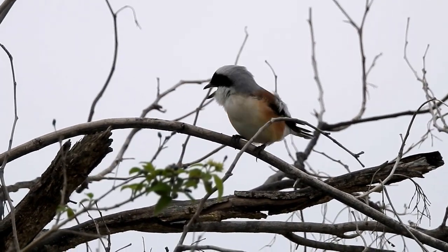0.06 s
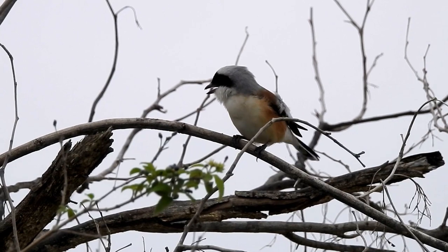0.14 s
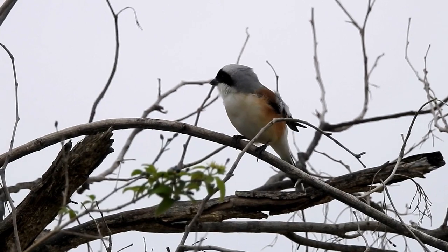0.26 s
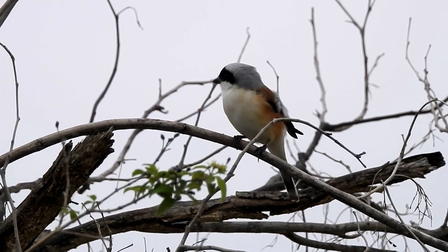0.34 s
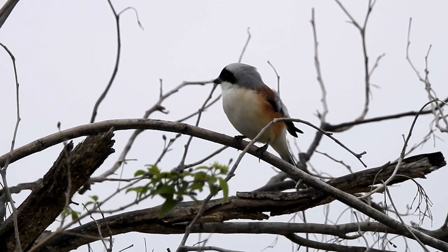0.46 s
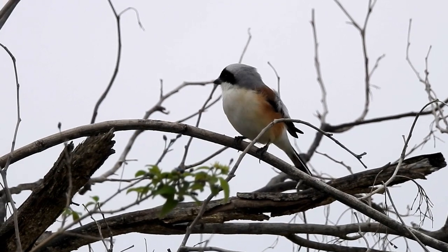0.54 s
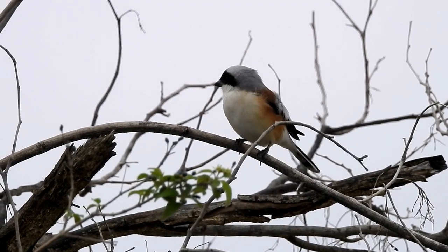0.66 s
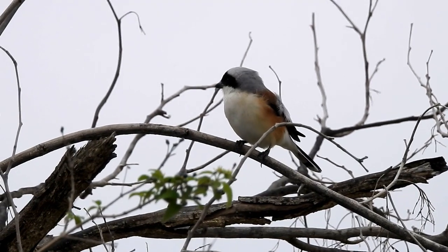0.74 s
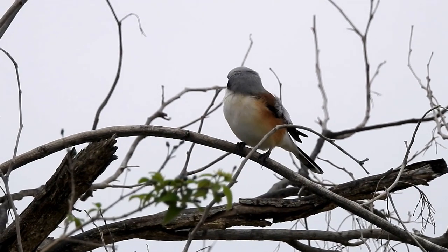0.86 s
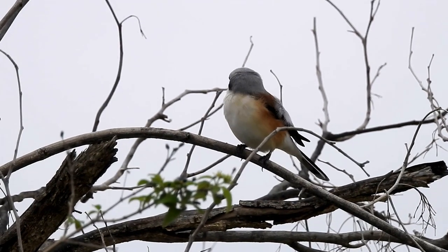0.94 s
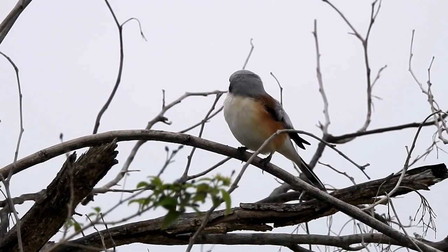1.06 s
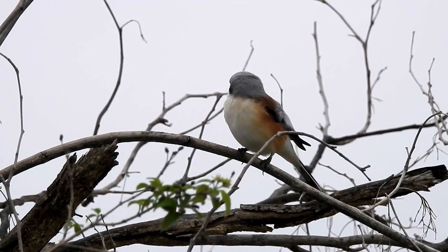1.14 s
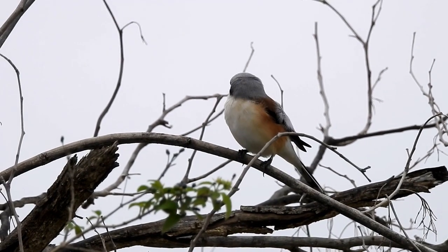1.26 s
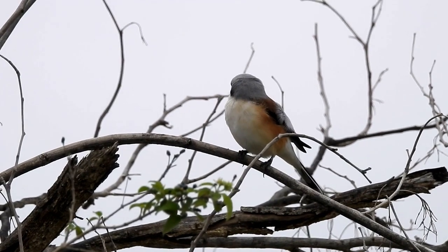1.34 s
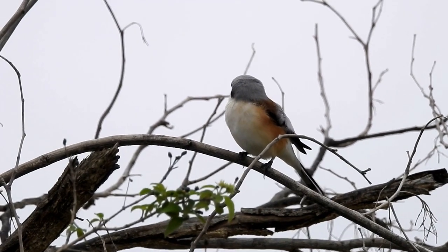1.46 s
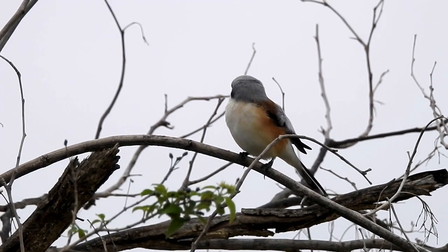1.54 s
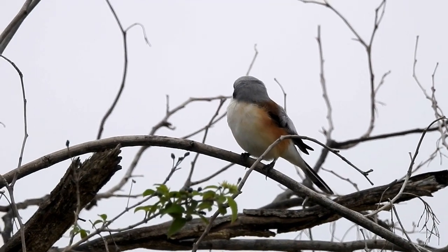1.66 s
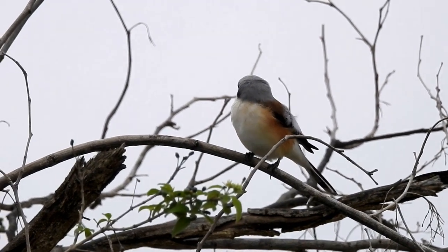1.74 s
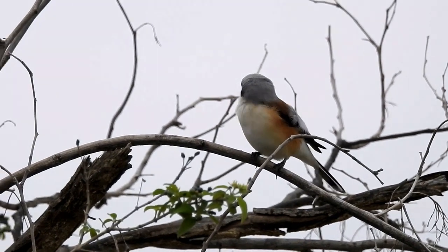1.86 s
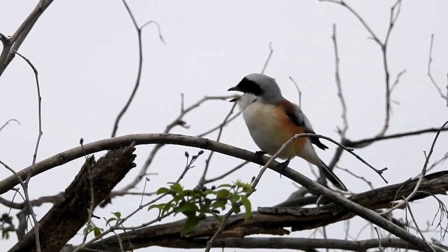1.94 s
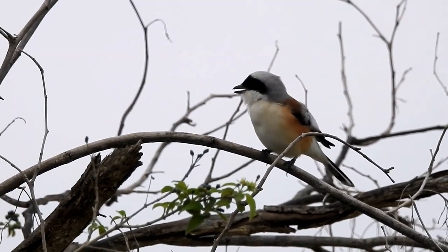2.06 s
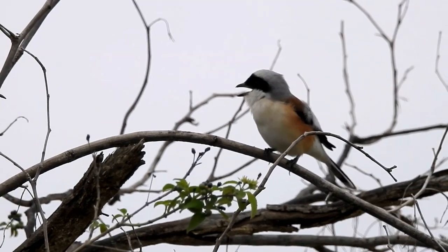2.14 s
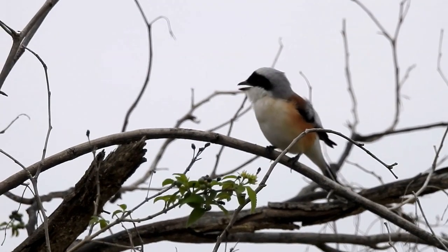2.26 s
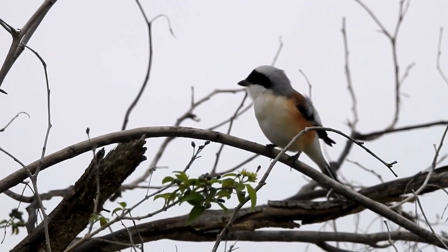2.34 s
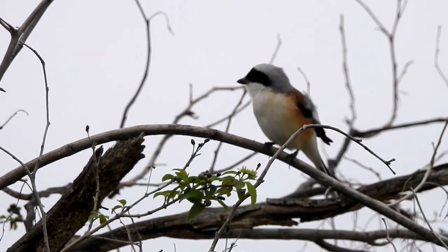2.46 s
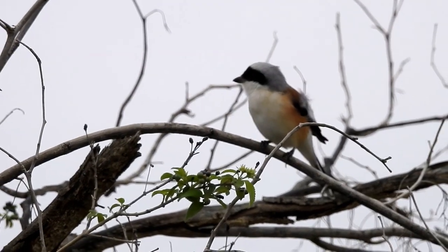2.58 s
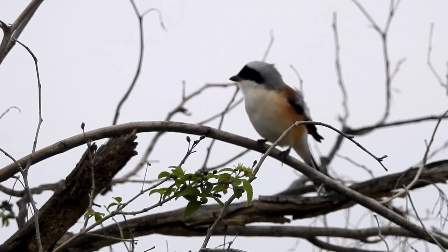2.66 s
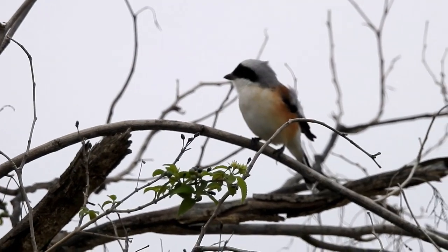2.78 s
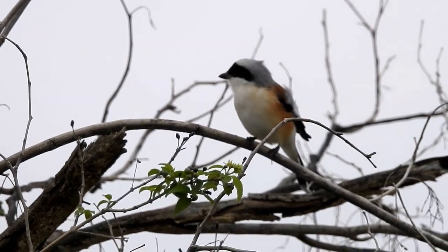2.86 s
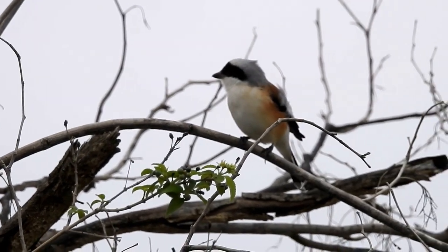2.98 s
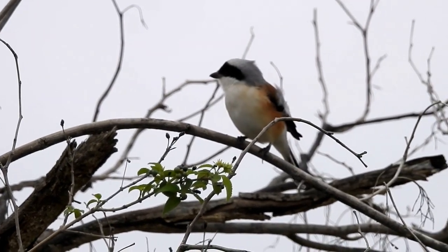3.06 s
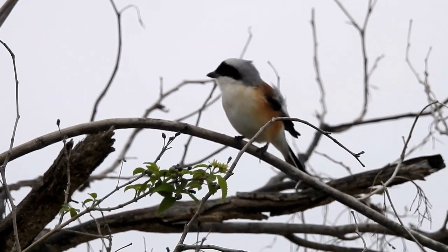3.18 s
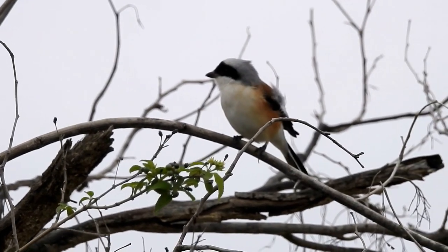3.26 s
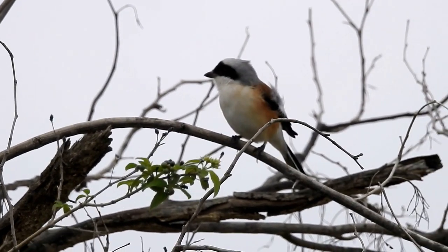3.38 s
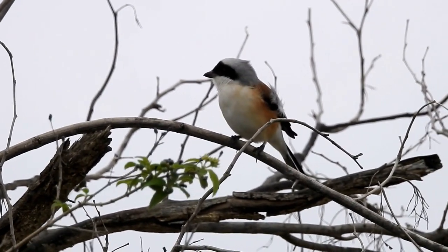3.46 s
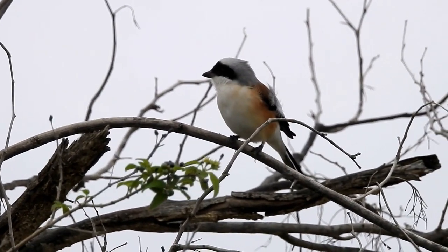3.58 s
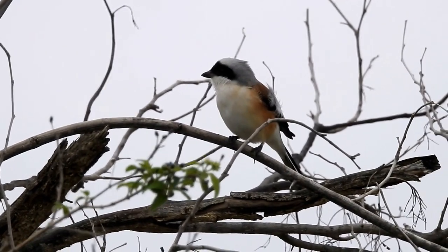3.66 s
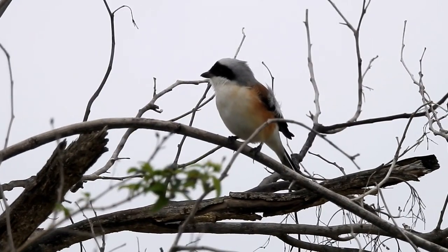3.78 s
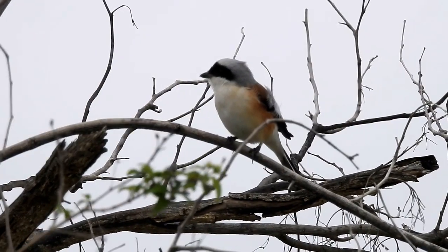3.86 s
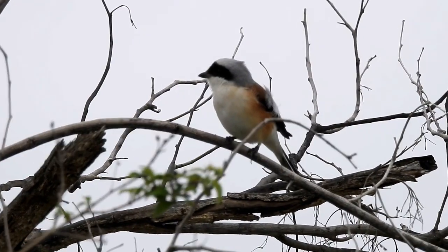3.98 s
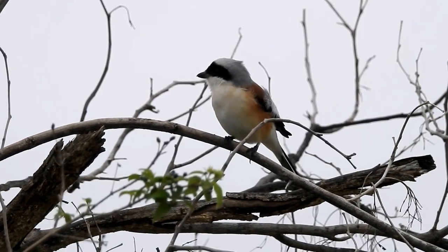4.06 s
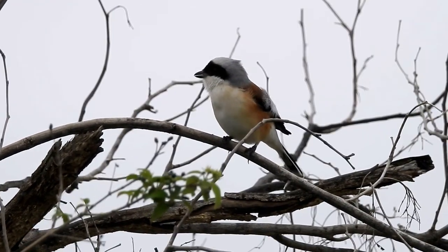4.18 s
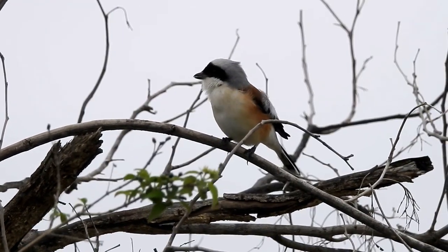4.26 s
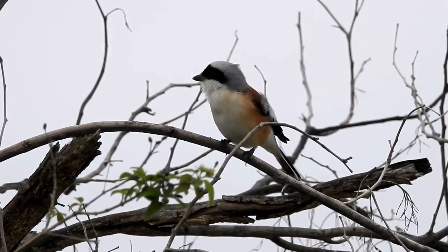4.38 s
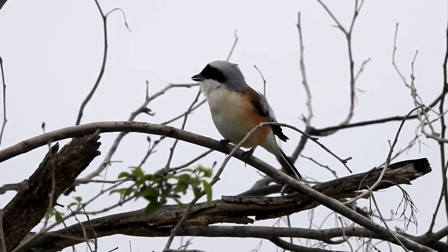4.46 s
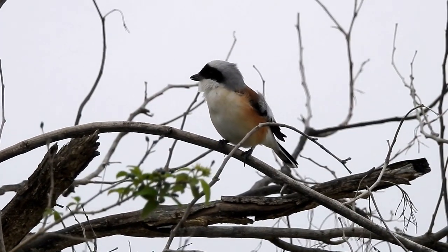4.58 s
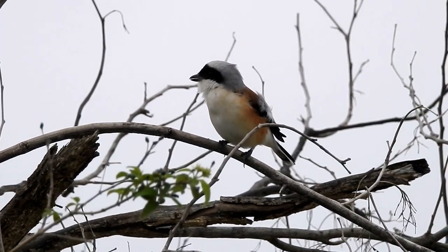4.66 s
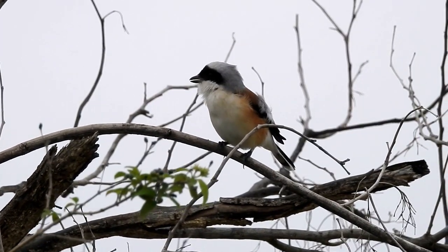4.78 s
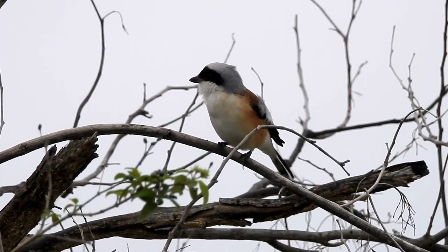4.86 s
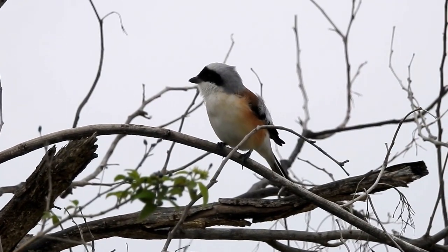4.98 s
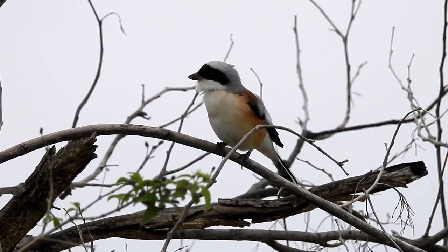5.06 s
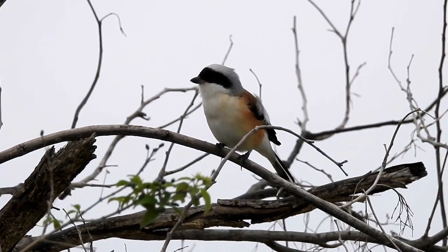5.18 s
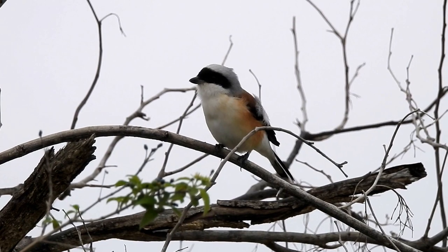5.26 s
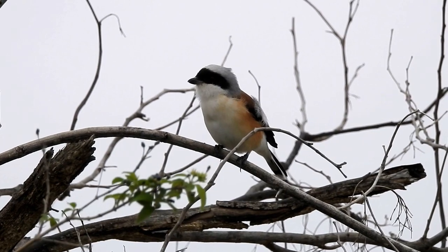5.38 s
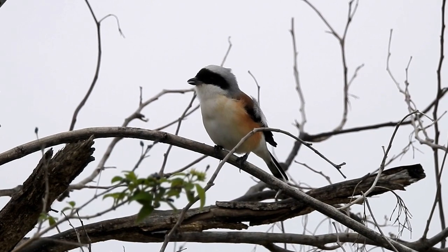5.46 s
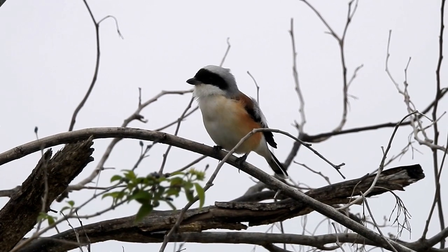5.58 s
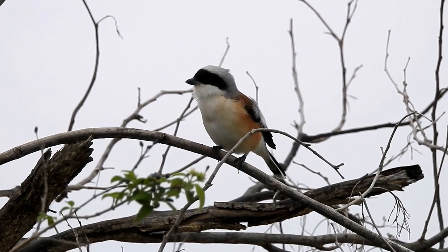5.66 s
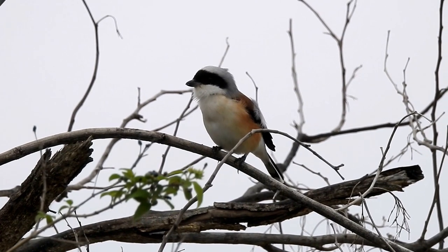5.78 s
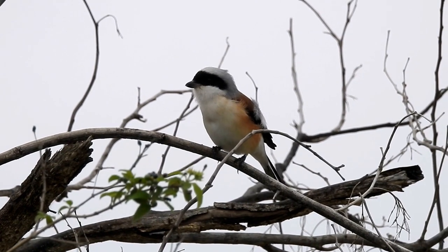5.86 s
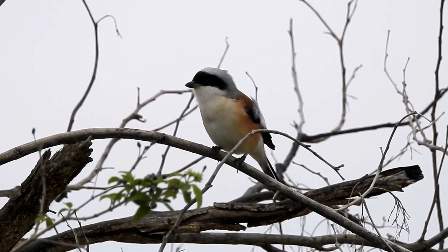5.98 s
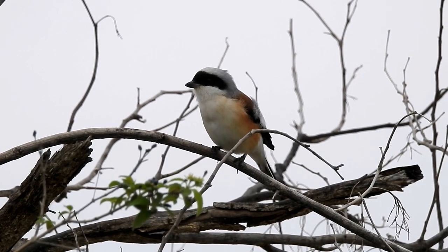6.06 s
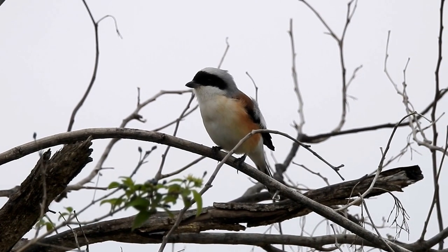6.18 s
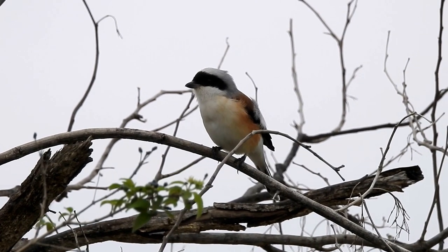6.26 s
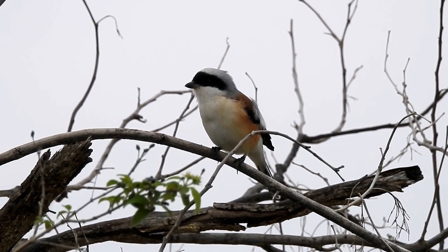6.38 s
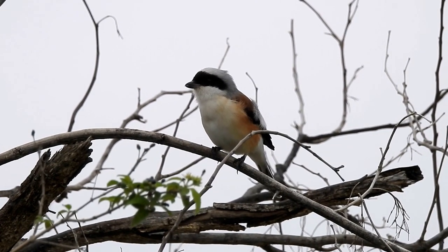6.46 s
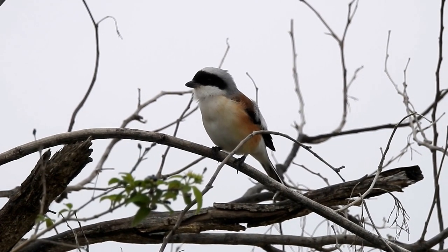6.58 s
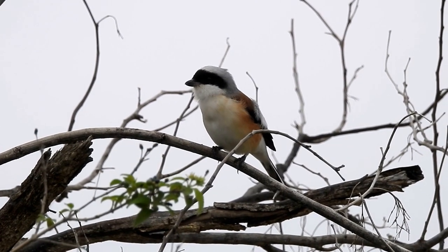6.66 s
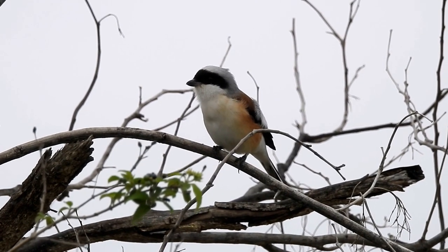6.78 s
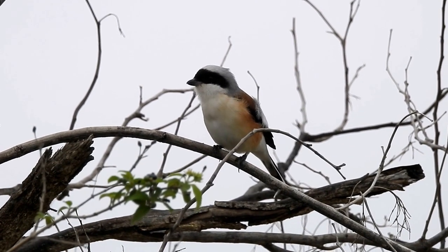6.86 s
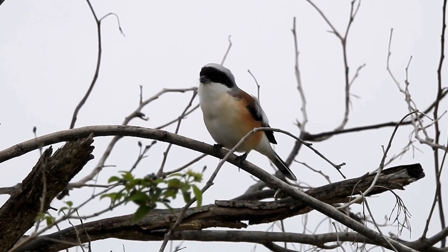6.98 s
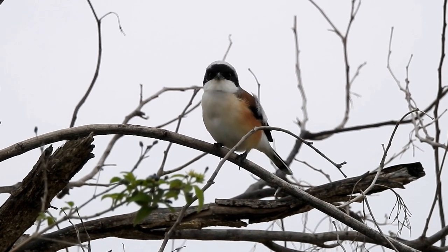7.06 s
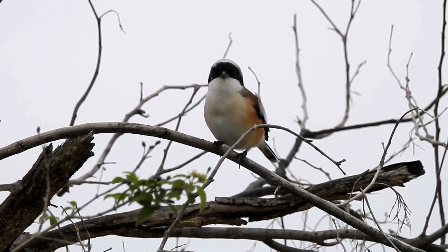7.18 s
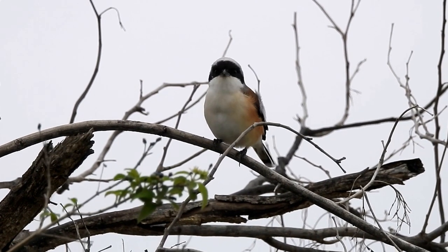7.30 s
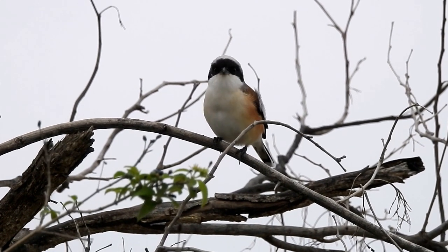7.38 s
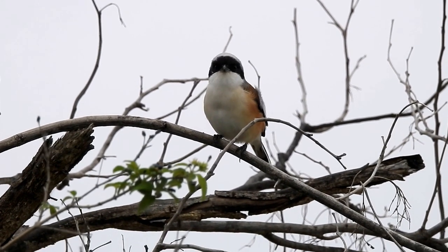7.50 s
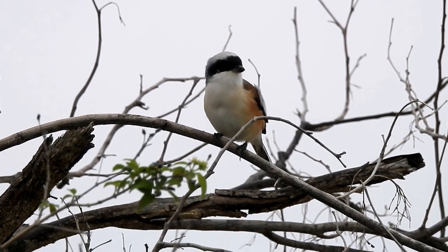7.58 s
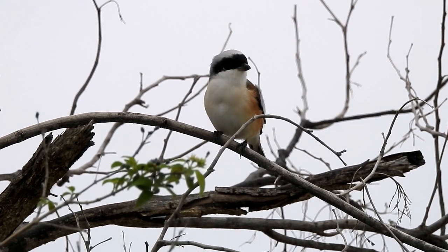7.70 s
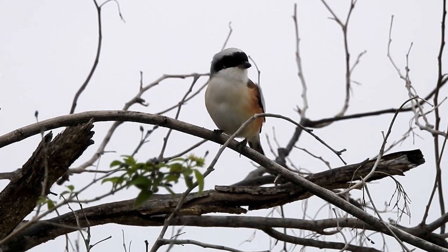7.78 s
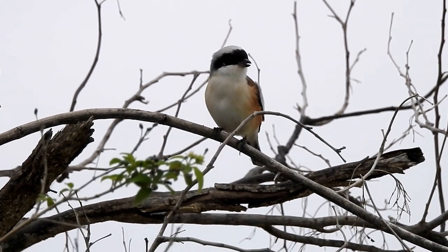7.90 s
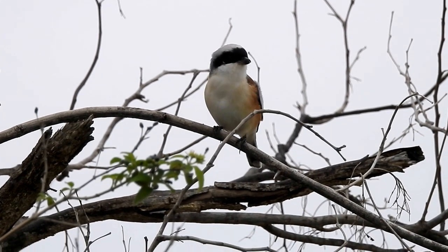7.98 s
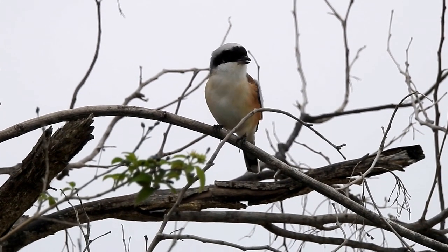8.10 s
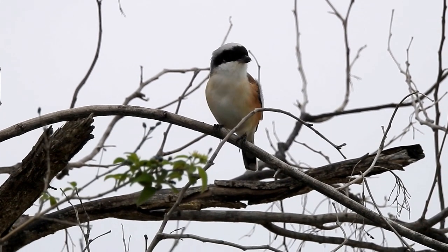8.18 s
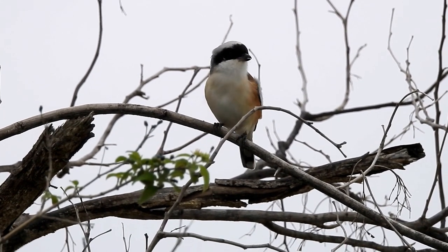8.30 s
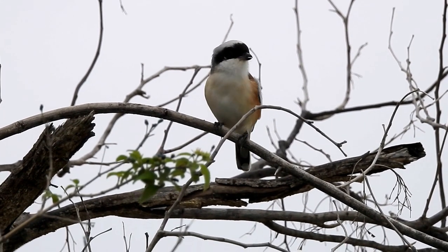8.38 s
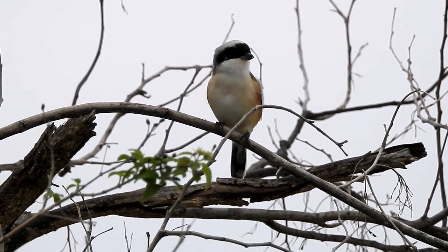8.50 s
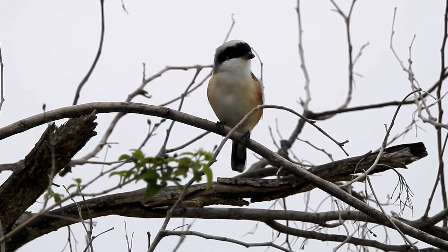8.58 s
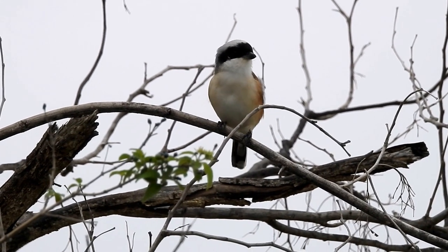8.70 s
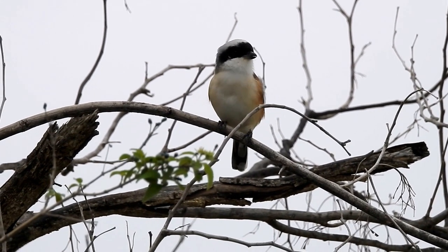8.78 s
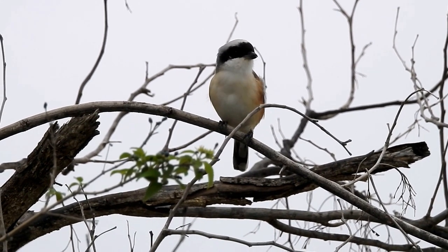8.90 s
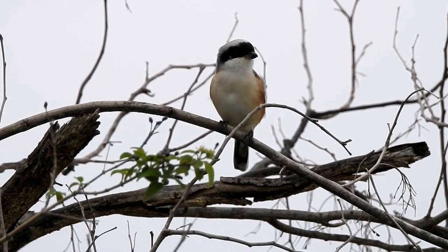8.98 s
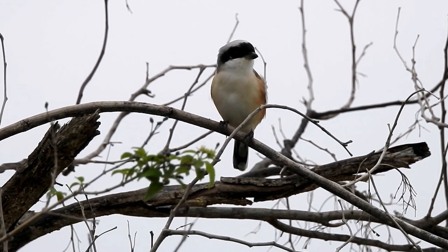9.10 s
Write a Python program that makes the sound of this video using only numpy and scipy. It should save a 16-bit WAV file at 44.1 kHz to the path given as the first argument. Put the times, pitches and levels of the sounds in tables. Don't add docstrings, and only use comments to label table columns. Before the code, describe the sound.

Open air among bare branches, in stereo on a camera microphone. Immediately a near bird gives a loud, harsh, throbbing rasp, bright and noisy, lasting about 0.2 s. Faint far calls and a thin chip follow. At 1.9-2.3 s a second, longer rasp comes in two rattling bursts. A small bird farther left, smeared by leaves and tree echo, repeats a rapid phrase of steep falling sweeps about every 0.4 s from 2.3 to 4.6 s, with a faint one at 1.6 s, and again from 7.5 s to the end. From about 3.8 s the near bird rambles much more softly: thin whistles, reedy squeaks, little buzzes, a squeezed climb at 4.8 s, and a sharp rising whip at 8.15 s. Distant birds murmur, mostly until 7.7 s. Low wind lumps and dull knocks hit the microphone, notably at 3-5 s and 7-8.7 s, over steady leaf noise and hiss.

```python
import sys
import numpy as np
from scipy import signal
from scipy.fft import rfft, irfft
from scipy.io import wavfile
from scipy.ndimage import uniform_filter1d

SR = 44100
rng = np.random.default_rng(int(sys.argv[2]) if len(sys.argv) > 2 else 0)


def materialize(psi):
    bounded = np.clip(np.atleast_2d(psi).T, -1, 1)
    quanta = np.round(bounded * 32767).astype(np.int16)
    wavfile.write(sys.argv[1], SR, quanta)


def ratio(d):
    e = np.asarray(d, float) / 20
    return 10 ** e


N = 403074
TIME = np.arange(N) / SR

# [start_s, peak_db, length_s, bill_opening_0_to_1]
RASP_PUFFS = [(0.0004, -15, 0.0078, 0.4), (0.0964, -16, 0.0051, 0), (0.1137, -11.5, 0.0053, 0),
              (0.133, -12, 0.007, 0), (0.1537, -13.5, 0.0093, 0), (0.1757, -14.5, 0.01, 0.1),
              (0.206, -20.5, 0.012, 0.3), (0.197, -14.5, 0.0083, 0.2), (1.9028, -25.5, 0.008, 0.9),
              (1.9227, -16, 0.0052, 1), (1.9407, -18, 0.0091, 1), (1.961, -14, 0.0065, 1),
              (1.983, -13.5, 0.0057, 1), (2.0027, -18, 0.011, 0.8), (2.0235, -11.5, 0.0072, 0.4),
              (2.043, -13, 0.013, 0.7), (2.067, -15.5, 0.0067, 0.2), (2.0794, -13, 0.0085, 0.1),
              (2.092, -24, 0.0067, 0.1), (2.197, -17, 0.0053, 0), (2.216, -15, 0.0067, 0),
              (2.2365, -12.5, 0.005, 0), (2.256, -12.5, 0.0078, 0), (2.2787, -14.5, 0.0097, 0.2),
              (2.2988, -15, 0.0072, 0), (2.311, -17.5, 0.0068, 0.2)]
# [freq_hz, level_db_per_hz]
RASP_THROAT_DB = [(410, -46), (700, -41.5), (1060, -21.5), (1360, -36.5), (1550, -19), (1850, -37),
                  (2110, -27), (3800, -23), (4210, -9), (5380, 0), (6190, -5.5), (8420, -23.5),
                  (9210, -35.5), (10600, -49), (15000, -53)]
# [start_s, length_s, centre_hz, width_hz, level_db]
EVEN_BUZZES = [(3.809, 0.017, 5740, 3170, -39), (3.819, 0.0093, 2550, 3000, -44),
               (4.561, 0.039, 4444, 2000, -52), (4.8, 0.05, 4350, 1500, -44),
               (4.887, .008, 4000, 1400, -45), (4.897, 0.034, 2963, 2310, -44.5),
               (5.116, 0.027, 3700, 1900, -48), (5.825, 0.09, 3700, 1500, -55),
               (7.165, 0.0093, 2180, 3500, -50), (7.253, .03, 2980, 2980, -49), (8.7, .13, 5800, 2100, -60),
               (8.862, 0.059, 4800, 3460, -55.5)]
# [start_s, length_s, centre_hz, width_hz, level_db]
THROBBING_BUZZES = [
    (4.692, 0.055, 3450, 1200, -45),
    (6.785, .04, 2840, 1900, -49.5),
    (8.395, .09, 1740, 400, -57.5),
    (8.402, 0.12, 3280, 1800, -45),
]
# [start_s, length_s, from_hz, to_hz, peak_db]
WHISTLE_GLIDES = [(2.85, .16, 2700, 2550, -64), (4.275, .022, 4250, 3950, -55),
                  (4.582, .008, 4114, 4000, -45), (4.603, .02, 2650, 2600, -50),
                  (5.13, .01, 4114, 4200, -43), (5.14, .035, 1540, 1620, -52),
                  (5.385, .09, 2520, 2450, -53), (5.59, .026, 2300, 2264, -55),
                  (5.63, .08, 1991, 2250, -57), (5.71, .055, 2235, 2160, -58),
                  (5.81, .048, 2700, 2430, -48), (5.868, .03, 2420, 2720, -46),
                  (6.598, .02, 3100, 2750, -47), (7.284, .011, 1950, 2150, -48),
                  (6.752, .03, 1500, 2100, -56), (7.232, .015, 2050, 2110, -54),
                  (7.252, .012, 2650, 2000, -46), (7.47, .06, 1260, 2391, -55),
                  (7.55, .07, 2352, 2080, -57), (7.85, .03, 2100, 2000, -61),
                  (8.306, .016, 2800, 2080, -46), (8.322, .026, 2030, 2090, -45),
                  (4.593, .008, 3200, 3100, -46)]
# [start_s, length_s, from_hz, to_hz,
# peak_db]
UNDERTONE_GLIDES = [
    (5.133, .014, 2120, 2220, -45),
    (5.235, .055, 1830, 1680, -59),
    (5.39, .05, 1640, 2340, -56),
    (5.65, .095, 2620, 2600, -57),
    (5.835, .05, 3700, 3500, -55),
    (8.125, .025, 7500, 8800, -62),
]
# [time_from_drop_s, pitch_hz, level_db]
DROP_WHISTLE = [(-.09, 3980, -10), (0, 3920, -10), (.03, 3430, 0), (.085, 2600, -13)]
# [start_s, peak_db]
DROP_TIMES = [
    (.622, -58),
    (1.905, -63),
    (3.037, -56),
]
# [time_s, pitch_hz, level_db]
FALLING_WHISTLE = [(4.3, 3550, -60), (4.325, 3270, -39), (4.345, 3200, -46), (4.38, 2990, -50),
                   (4.405, 2590, -47), (4.47, 2310, -67)]
# [time_s, pitch_hz, level_db]
RISING_WHIP = [(8.07, 3000, -64), (8.11, 3580, -60), (8.138, 3900, -56), (8.146, 4370, -37),
               (8.157, 5290, -28), (8.174, 5700, -40)]
# [time_s, pitch_hz, level_db]
SQUEEZED_CLIMB = [(4.757, 1510, -50), (4.772, 1744, -42.5), (4.79, 1877, -36.5), (4.838, 1920, -40),
                  (4.843, 2150, -33), (4.847, 2400, -44)]
# [start_s, length_s, from_hz, to_hz, peak_db]
SQUEEZED_GLIDES = [
    (4.848, .008, 1564, 1620, -38),
    (4.853, .009, 1980, 2330, -39),
]
REEDY_GLIDES = [
    (5.896, .022, 1420, 1790, -41),
    (6.803, .026, 1500, 1700, -42),
    (8.293, .026, 1680, 1590, -48),
    (8.87, .046, 1063, 1850, -38),
]
OPEN_THROAT_GLIDES = [
    (7.045, .024, 2830, 2570, -37),
    (7.266, .02, 1730, 1760, -43),
    (8.912, .011, 1826, 2570, -47),
]
SHUT_BILL_GLIDES = [
    (8.625, .1, 1120, 1370, -54),
    (8.725, .075, 1340, 1440, -55),
]
SQUEEZED_PARTIALS_DB = (-19, 0, -8)
REEDY_PARTIALS_DB = (-6, 0, -12)
OPEN_PARTIALS_DB = (0, -4, -20)
SHUT_BILL_PARTIALS_DB = (0, -10, -24)
WHISTLE_SWELL_DB, REED_SWELL_DB = 4, 6

# [time_from_second_note_s, pitch_hz, level_db]
NEIGHBOUR_PHRASE = [
    [(-.057, 7100, -10), (-.051, 6300, -5), (-.044, 4700, -11)],
    [(0, 7050, -1), (.006, 6500, -1), (.012, 6000, -1), (.019, 4700, -5), (.03, 2600, -20)],
    [(.05, 6800, -3), (.066, 6300, 0), (.077, 4800, -6), (.104, 2550, -17)],
    [(.115, 4000, -8), (.125, 5100, -4), (.137, 5900, -6)],
    [(.158, 4050, -13), (.172, 4500, -15)],
    [(.182, 2700, -17), (.19, 3300, -20), (.198, 2700, -23)],
]
# [start_s, peak_db]
PHRASE_TIMES = [(1.5718, -53), (2.3444, -42.5), (2.738, -41), (3.1452, -39), (3.5629, -41), (3.9843, -38.5),
                (4.4124, -37.5), (7.5036, -52), (7.8964, -44), (8.2694, -41), (8.6722, -39), (9.0698, -38)]
# [time_s, pitch_hz, level_db]
FALLING_CHIP = [(1.045, 7100, -56), (1.058, 6280, -54.5), (1.07, 6060, -61), (1.085, 5900, -68)]
# [start_s, length_s, centre_hz, level_db]
FAR_CALLS = [(0.353, 0.16, 1830, -69), (0.506, 0.098, 2100, -65), (0.637, 0.063, 2010, -63),
             (0.894, 0.13, 2050, -61.5), (1.09, 0.087, 2100, -62), (1.26, 0.17, 2130, -63),
             (1.50, .2, 2150, -62), (1.75, 0.33, 2140, -64), (2.38, 0.14, 2000, -67),
             (2.878, 0.13, 2200, -68), (3.40, 0.1, 2090, -66), (3.606, 0.16, 1770, -62),
             (3.75, 0.33, 2170, -66), (4.30, 0.46, 2070, -64.5), (4.658, 0.22, 1710, -62.5),
             (4.95, 0.16, 2050, -64), (5.205, 0.19, 1980, -66), (5.72, 0.18, 1820, -58),
             (5.37, .35, 3200, -64), (5.74, .2, 3300, -58), (5.95, .16, 3250, -61), (6.18, .2, 3350, -62),
             (6.208, 0.31, 1980, -64), (6.442, .23, 3380, -63), (6.53, 0.44, 1900, -65.5),
             (6.826, 0.065, 3100, -62), (6.98, 0.48, 3100, -62.5), (7.003, 0.47, 1780, -61.5),
             (7.534, 0.19, 3100, -61), (7.562, 0.11, 1830, -62)]

# [freq_hz, level_db_per_hz]
WIND_SPECTRUM = [(15, -40), (25, -31), (156, 3.5), (275, -6), (323, -11.5), (738, -31.5), (1020, -35),
                 (1200, -28.5), (1560, -59), (2640, -120)]
# [peak_time_s, peak_db, time_to_swell_or_sink_20db_s]
EDDIES = [(0.001, -47, .03), (.15, -54, .2), (1.42, -50, .04), (1.78, -56, .08), (2.04, -60, .15),
          (2.26, -52, .12), (2.67, -47, .07), (2.96, -43, .07), (3.11, -52, .15), (3.26, -35, .05),
          (3.33, -55, .15), (3.855, -37, .06), (9.05, -60, .2), (4.1, -45, .06), (4.2, -54, .3),
          (4.35, -45, .12), (4.6, -42, .1), (4.76, -46, .07), (4.99, -40, .05), (5.12, -52, .1),
          (6.72, -60, .05), (7.03, -45, .04), (7.25, -37, .14), (7.54, -53, .12), (7.74, -46, .12),
          (8.15, -54, .12), (8.27, -58, .08), (8.43, -42, .07), (8.575, -38, .04), (8.69, -35, .09)]
# [start_s, peak_db, ring_hz]
PORT_KNOCKS = [
    (0.983, -51, 1030),
    (1.417, -41, 681),
    (3.195, -41, 816),
    (4.102, -42.5, 958),
    (4.976, -37.5, 336),
]
# [freq_hz, level_db_per_hz]
AIR_SPECTRUM = [(24, -46), (40, 1), (82, -21.5), (143, 0), (202, 3), (472, -2.5), (973, -3.5), (1190, -4.5),
                (1380, -5.5), (1730, -4), (3740, -9.5), (6640, -9), (15500, -37.5)]
# [freq_hz, side_minus_mid_db]
AIR_SPREAD = [(60, -2), (110, -10), (200, -16.5), (380, -2.5), (700, -4.5), (1290, -4.5), (2380, -5.5),
              (4400, -2), (8120, -0.5), (15000, 0)]


def rasp():
    drive = flutter(690, .12, 0.87) + 0.94 * rng.standard_normal(N)
    voice = level(colour(drive, RASP_THROAT_DB), -9.5)
    upper = band(voice, 6340, 1300)
    closed, opened = np.zeros(N), np.zeros(N)
    for start, db, length, bill in RASP_PUFFS:
        puff = ratio(db) * gate(start, length, 0.0024, 0.0064)
        closed += puff
        opened += puff * bill
    return voice * closed + upper * opened


def buzzes():
    drive = flutter(800, .3, 3.0) + .5 * rng.standard_normal(N)
    rise_s, fall_s = 0.0055, 0.0095
    even = sum(burst(drive, *row, rise_s, fall_s) for row in EVEN_BUZZES)
    throbbing = sum(burst(drive, *row, rise_s, fall_s) for row in THROBBING_BUZZES)
    throb_hz, throb_depth = 79, .5
    return even + throbbing * (1 + throb_depth * np.sin(2 * np.pi * throb_hz * TIME + 1.5))


def whistles():
    pure = sing(glides(WHISTLE_GLIDES + UNDERTONE_GLIDES, WHISTLE_SWELL_DB) + [FALLING_WHISTLE])
    pure = pure + sing([RISING_WHIP], (0, -42, -60), edge=.002)
    return pure + sum(sing([DROP_WHISTLE], shift=s, gain_db=db) for s, db in DROP_TIMES)


def reeds():
    squeezed = glides(SQUEEZED_GLIDES, REED_SWELL_DB) + [SQUEEZED_CLIMB]
    out = sing(squeezed, SQUEEZED_PARTIALS_DB, edge=.002)
    out = out + sing(glides(REEDY_GLIDES, REED_SWELL_DB), REEDY_PARTIALS_DB)
    out = out + sing(glides(OPEN_THROAT_GLIDES, REED_SWELL_DB), OPEN_PARTIALS_DB)
    return out + sing(glides(SHUT_BILL_GLIDES, WHISTLE_SWELL_DB), SHUT_BILL_PARTIALS_DB)


def shrike():
    tones = whistles() + reeds()
    grain = ratio(1. * walk(120) + 2.2 * walk(700))
    song = tones * grain + buzzes()
    loud = rasp()
    return pan(loud, -1.5) + pan(song, -0.34) + echo(loud + song, 0.25, -10, 0.0021)


def neighbour():
    song = sum(sing(NEIGHBOUR_PHRASE, shift=s, gain_db=db - 7, edge=0.001018) for s, db in PHRASE_TIMES)
    song = song + sing([FALLING_CHIP])
    song = song * ratio(2. * walk(400))
    leaves = echo(song, .07, -1., .001)
    trees = echo(1.05 * song + .5 * band(song, 4600, 1400), 0.42, -1.8, .01)
    return pan(1.1 * song + leaves + trees, 7.0)


def murmur():
    mid, side = rng.standard_normal((2, N)) * ratio(2.0 * walk(30))
    cloud = mid + 0.37 * side * np.array([[1], [-1]])
    return sum(burst(cloud, s, length, hz, hz * 0.13, db, 0.0083, 0.016)
               for s, length, hz, db in FAR_CALLS)


def wind():
    left, right = (level(colour(rng.standard_normal(N), WIND_SPECTRUM), 0) for _ in range(2))
    ports = pan(np.array([left, right - .3 * left]), 3.5)
    coarse = TIME[::64]
    lull_db = -74
    force = ratio(lull_db) + sum(ratio(db - 20 * np.abs(coarse - s) / width) for s, db, width in EDDIES)
    gusts = ports * np.interp(TIME, coarse, force) * ratio(2.8 * walk(40) + 2.2)
    knocks = np.zeros(N)
    for s, db, hz in PORT_KNOCKS:
        push = left + rng.standard_normal(N)
        knocks += burst(push, s, 0.0022, hz * 0.81, hz * 0.52, db - 7.5, 0.0013, 0.014)
    return gusts + pan(knocks, 3.0)


def air():
    leaves_db, hiss_db = -55.5, -66.5
    mid, side = (colour(rng.standard_normal(N), AIR_SPECTRUM) for _ in range(2))
    wide = mid + colour(side, AIR_SPREAD) * np.array([[1], [-1]])
    leaves = level(wide, leaves_db) * ratio(1.02 * walk(2.83))
    return leaves + level(rng.standard_normal((2, N)), hiss_db)


def flutter(hz, jitter, scatter_db):
    chance = rng.standard_normal((N // 20, 2))
    at = np.cumsum(SR / hz * np.exp(jitter * chance[:, 0])).astype(int)
    x = np.zeros(N)
    x[at[at < N]] = ratio(scatter_db * chance[at < N, 1])
    return level(x, 0)


def sing(notes, partials_db=(0,), shift=0., gain_db=0., edge=.003, roll_db=-13.0):
    out = np.zeros(N + SR)
    if len(partials_db) > 1:
        partials_db = (*partials_db, partials_db[-1] + roll_db, partials_db[-1] + 2 * roll_db)
    for note in notes:
        s, hz, db = np.transpose(note)
        t = np.arange(s[0] - edge, s[-1] + edge, 1 / SR)
        phase = 2 * np.pi * np.cumsum(np.interp(t, s, hz)) / SR
        tone = 0
        for k, partial_db in enumerate(partials_db, 1):
            if k * hz.max() < SR / 3:
                tone = tone + ratio(partial_db) * np.sin(k * phase)
        i = int((t[0] + shift) * SR)
        fade = np.clip(np.minimum(t - t[0], t[-1] - t) / (2 * edge), 0, 1)
        out[i:i + len(t)] += np.sqrt(2) * ratio(gain_db + np.interp(t, s, db)) * tone * fade
    return out[:N]


def glides(rows, swell_db):
    return [[(s, a, db - swell_db), (s + length / 2, (a + b) / 2, db), (s + length, b, db - swell_db)]
            for s, length, a, b, db in rows]


def burst(source, start, length, hz, width_hz, db, rise, fall):
    out = np.zeros(source.shape)
    here = slice(int(start * SR), int((start + length + 4 * fall) * SR))
    sound = level(band(source[..., here], hz, width_hz), db)
    out[..., here] = sound * gate(start, length, rise, fall)[here]
    return out


def gate(start, length, rise, fall):
    out, i = np.zeros(N), max(int(start * SR), 0)
    u = TIME[i:i + int((length + 4 * fall) * SR)] - start
    out[i:i + len(u)] = np.clip(u / rise, 0, 1) * np.exp(-(np.clip(u - length, 0, 1) / fall) ** 2)
    return out


def walk(rate):
    k = int(SR / rate)
    held = np.repeat(rng.standard_normal(N // k + 1), k)
    return level(uniform_filter1d(uniform_filter1d(held, k), k)[:N], 0)


def level(x, db):
    return x * ratio(db) / np.sqrt(np.mean(x ** 2))


def colour(x, points):
    hz, db = np.transpose(points)
    grid = np.maximum(np.arange(2049) * SR / 4096, 1)
    cep = irfft(np.interp(np.log(grid), np.log(hz), db) * np.log(10) / 20)
    cep[1:2048], cep[2049:] = 2 * cep[1:2048], 0
    return signal.fftconvolve(x, irfft(np.exp(rfft(cep))))[:len(x)]


def band(x, hz, width_hz):
    edges = np.sqrt(hz ** 2 + width_hz ** 2 / 4) + np.array([-width_hz, width_hz]) / 2
    return signal.sosfilt(signal.butter(2, edges, "band", fs=SR, output="sos"), x)


def pan(x, left_db):
    return x * ratio(np.array([[left_db], [-left_db]]) / 2)


def echo(x, t60_s, wet_db, gap_s):
    t = TIME[:SR // 2]
    tail = rng.standard_normal((3, len(t))) * np.exp(-np.log(1000) * t / t60_s) * (t > gap_s)
    tail = tail[0] + 1.2 * tail[1:]
    tail = tail * ratio(wet_db) / np.sqrt(np.mean(np.sum(tail ** 2, 1)))
    return signal.fftconvolve(x[None], tail, axes=1)[:, :N]


def scene():
    bird = shrike()
    rest = neighbour() + murmur() + air() + wind()
    shell = echo(band(bird.mean(axis=0), 6000, 3600), .03, -9, 0)
    return bird + shell - shell[::-1] + rest


def band_limit(x):
    return signal.sosfilt(signal.butter(12, 16240, fs=SR, output="sos"), x)


def record(dry):
    top_cut = signal.ellip(10, .2, 70, 15780, fs=SR, output="sos")
    mix = signal.sosfilt(top_cut, dry)
    return band_limit(mix)


dry = scene()
out = record(dry)
materialize(out)
```